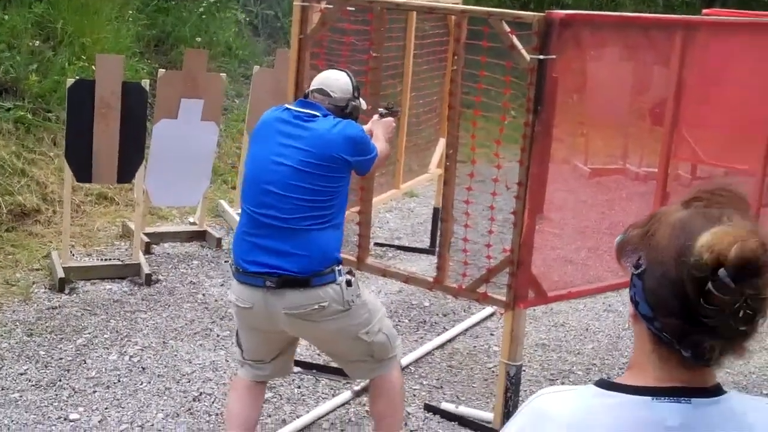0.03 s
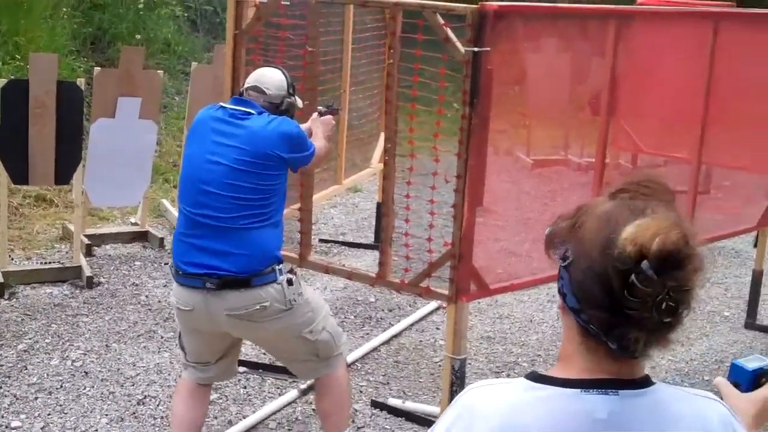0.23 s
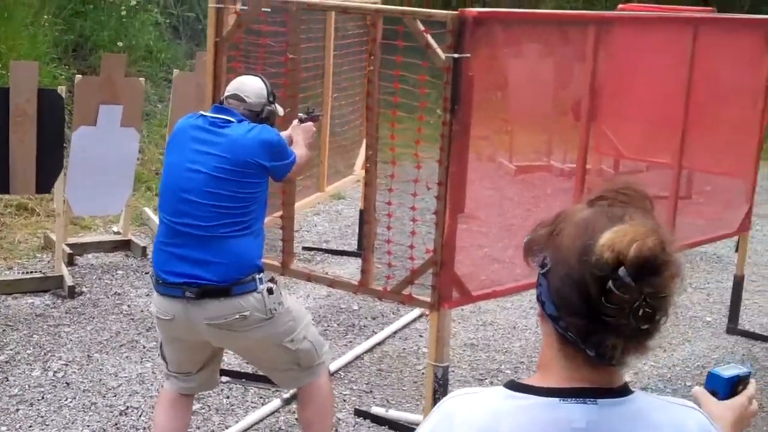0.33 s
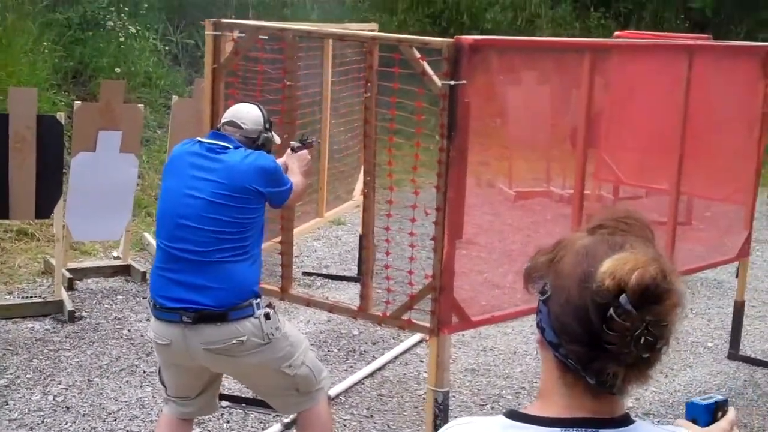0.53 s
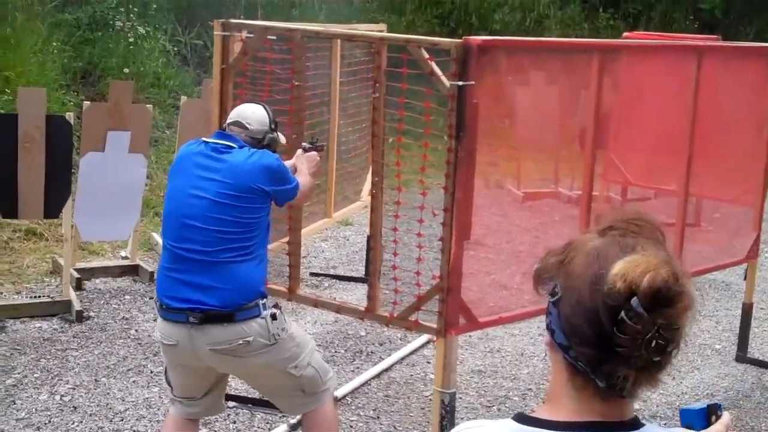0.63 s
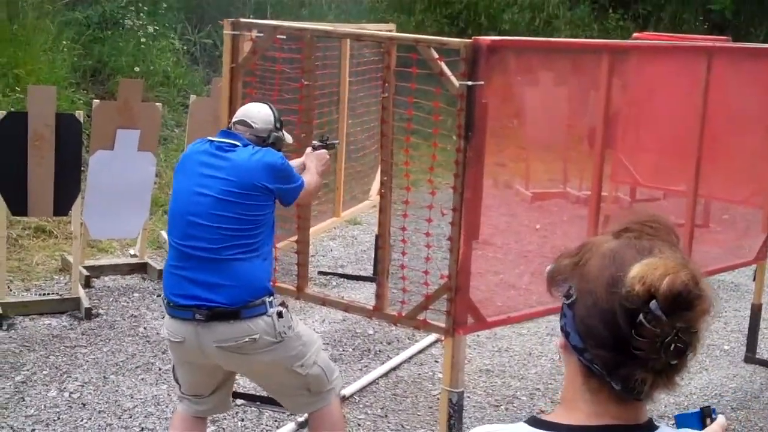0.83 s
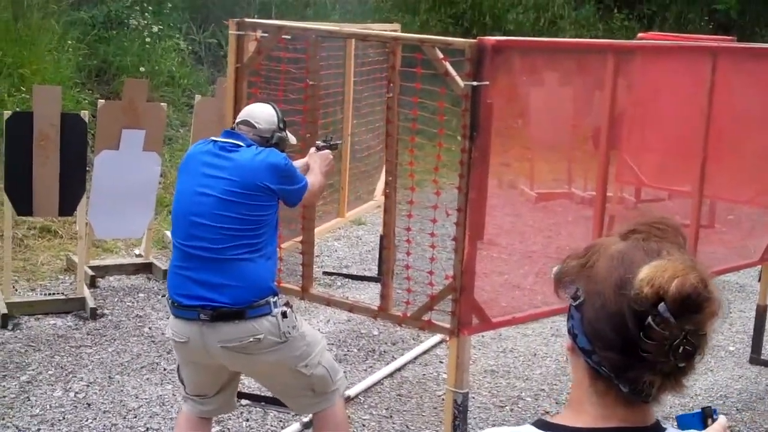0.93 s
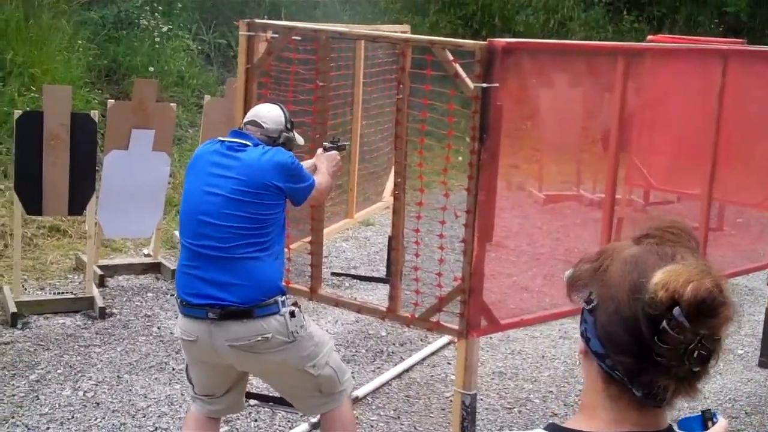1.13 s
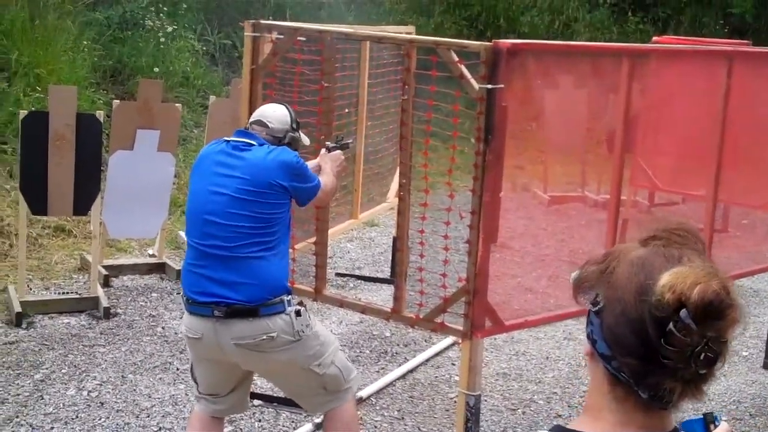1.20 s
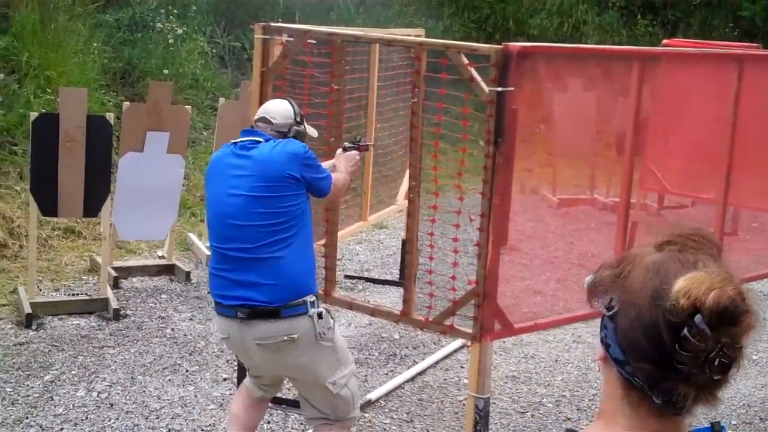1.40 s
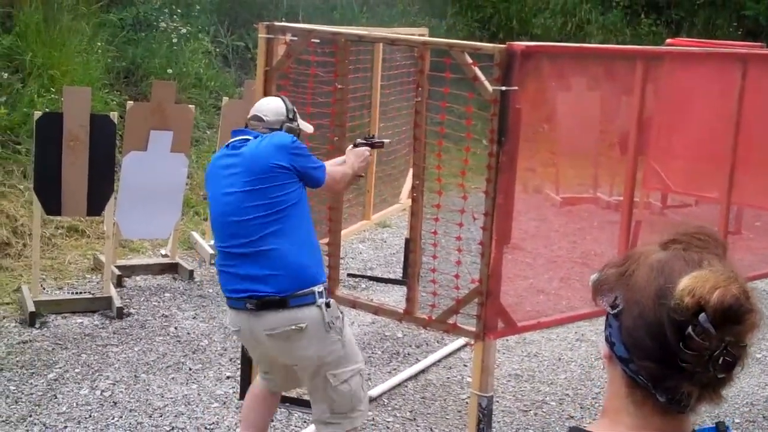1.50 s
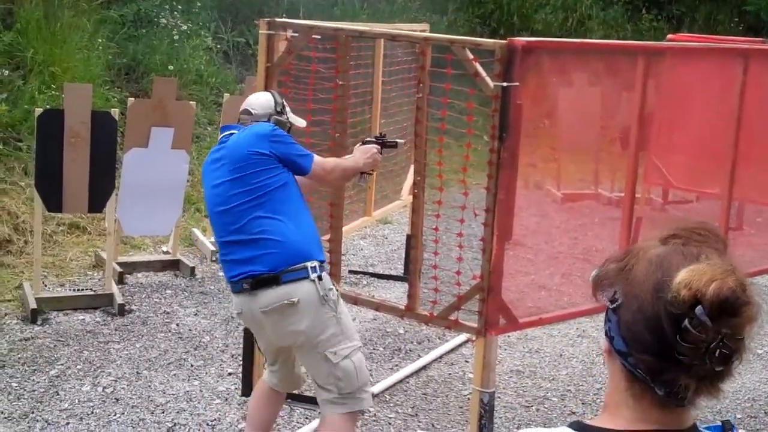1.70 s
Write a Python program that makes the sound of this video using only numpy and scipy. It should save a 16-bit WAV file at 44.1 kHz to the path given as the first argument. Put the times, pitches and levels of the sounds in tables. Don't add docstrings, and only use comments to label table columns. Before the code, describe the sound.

Four loud handgun shots fire about a third of a second apart in an outdoor gravel bay, with hard slap echoes and a fading tail from the trees, heard a few steps behind on an overloading microphone.

```python
import sys
import numpy as np
from scipy import signal
from scipy.fft import rfft, irfft
from scipy.io import wavfile

SR = 44100
rng = np.random.default_rng(int(sys.argv[2]) if len(sys.argv) > 2 else 0)


def voltage_ratio(decibels):
    exponent = np.asarray(decibels, float) / 20
    return 10 ** exponent


def output_pcm(signal):
    pcm = np.clip(np.atleast_2d(signal).T, -1, 1) * 32767
    wavfile.write(sys.argv[1], SR, np.round(pcm).astype(np.int16))


N = 77175

# t/s, blast level/dB, recorder gain settled to/dB
SHOTS = [
    (0.2401, 2.5, 10.5),
    (0.6208, 0.5, 2.5),
    (0.9919, -1, -1),
    (1.2755, -2.5, 2),
]
# delay t/s, level/dB, pulse width/s
FRAME_ECHOES = [
    (.0022, -18.5, 0.001),
    (.0052, -21.5, .0008),
    (.0145, -10.5, .0006),
    (.0285, -7.5, .001),
    (.0365, 1.5, .0004),
    (.0410, -7.5, .0011),
    (.0421, -6, 0.0007),
]
# delay t/s, level/dB, half width/s
FRAME_ROWS = [
    (.003, 6, .003),
    (.013, 0, .003),
    (.021, -3.5, .002),
    (.027, -7, 0.0013),
    (0.031, -17.5, .002),
    (.037, -1, 0.0025),
    (0.043, -11, 0.00072),
]
# f/Hz, level/dB per Hz
FRAME_SPECTRUM = [(35, -42), (60, -22), (192, -12), (751, -1.5), (2810, -7.5), (3610, -2), (5960, -9.5),
                  (9190, -13), (13800, -41.5)]
BANK_SPECTRUM = [(35, -69), (60, -39), (201, -20), (316, -13), (686, -9.5), (881, -9.5), (3150, -5),
                 (8990, -14.5), (13800, -34)]
TREE_SPECTRUM = [(59, -52), (100, -22), (182, -26), (554, -8), (948, -7.5), (1460, -11), (2210, -8.5),
                 (8620, -20.5), (13800, -42.5)]
# f/Hz, level/dB per Hz
AIR_SPECTRUM = [(35, -51), (60, -31), (201, -10.5), (751, 1.5), (5960, -19.5), (11800, -40.5), (13800, -71)]
WIND_SPECTRUM = [(15, -6), (40, 2), (110, -4), (200, -22)]
# f/Hz, likeness/1
DIFFUSE_LIKENESS = [(60, -0.34), (230, 1), (900, 0.73), (3470, 0.33), (13400, -0.05)]
CLOSE_LIKENESS = [(60, 0.68), (230, 0.66), (900, 0.88), (3470, 0.59), (13400, 0.092)]
# f/Hz, left minus right level/dB
LEAN = [(60, 2), (230, 2.5), (900, 2), (3470, 3.5), (13400, -2)]
# multiple of the fundamental/1, level/dB
ENGINE_HARMONICS = [(1, -74.5), (2, -77.5), (4, -78)]
# t/s, level/dB
ENGINE_SWELL = [(0, 2.5), (.2, 4.5), (.5, 10), (.62, 3), (.76, -17), (.9, -9), (.95, 3), (1.1, 17),
                (1.75, -10)]
# t/s, level/dB, half length/s
TICKS = [
    (.135, -72, .012),
    (1.618, -52, .002),
    (1.677, -54, .003),
    (1.70, -53, .002),
    (1.731, -54, .003),
    (1.743, -53, .002),
]

PATTERN_SIZE = 65536


def rms_one(x):
    return x / np.sqrt(np.mean(x ** 2) + 1e-20)


def at_hz(points, hz):
    table = np.array(points)
    return np.interp(np.log(hz + 1), np.log(table[:, 0]), table[:, 1])


def tent(t, peak_s, before_db_s, after_db_s):
    slope = np.where(t < peak_s, before_db_s, -after_db_s)
    return voltage_ratio(slope * (t - peak_s))


def scatter(spectrum, per_s, size, likeness=DIFFUSE_LIKENESS, skew=0):
    impulses = rng.standard_normal((2, size))
    impulses[0] -= skew * rng.exponential(1, size)
    impulses *= rng.random((2, size)) < per_s / SR
    hz = np.arange(size // 2 + 1) * SR / size
    alike = np.clip(at_hz(likeness, hz), 0, .98)
    mid, side = rfft(impulses / impulses.std(axis=1)[:, None]) * voltage_ratio(at_hz(spectrum, hz))
    ears = np.sqrt(1 + alike) * mid + np.sqrt(1 - alike) * side * [[1], [-1]]
    balance = voltage_ratio(at_hz(LEAN, hz) * [[.5], [-.5]])
    return rms_one(irfft(ears * balance, size))


def moving_air():
    air = voltage_ratio(-61) * scatter(AIR_SPECTRUM, SR, size=N + 1)
    wind = voltage_ratio(-86) * scatter(WIND_SPECTRUM, SR, size=N + 1)
    return (air + wind)[:, :N]


def engine(t):
    fundamental_hz = 134
    wander = .006 * np.cumsum(rng.standard_normal(N)) / 10
    phase = 2 * np.pi * fundamental_hz * t + wander
    tone = sum(voltage_ratio(db) * np.sin(k * phase) for k, db in ENGINE_HARMONICS)
    return voltage_ratio(np.interp(t, *np.transpose(ENGINE_SWELL))) * tone


def gravel_ticks(t):
    bright = scatter([(2000, -17), (5000, 0), (13000, -6)], SR, size=N + 1)[:, :N]
    return bright * sum(voltage_ratio(db) * np.exp(-((t - s) / half_s) ** 2) for s, db, half_s in TICKS)


def dull_knock(t):
    start_s, level_db, ring_hz, t60_s = .2285, -47.5, 594, 0.22
    u = np.maximum(t - start_s, 0)
    crack = scatter(FRAME_SPECTRUM, 8500, size=N + 1)[:, :N]
    crack = crack * (0.75 + 0.38 * np.exp(-u / 0.0058))
    ring = np.sin(2 * np.pi * ring_hz * u)
    return (ring + crack) * voltage_ratio(level_db - 60 * u / t60_s) * (u > 0)


def reflectors():
    t = np.arange(PATTERN_SIZE) / SR
    skew = 1.2
    rows_db = sum(db * np.exp(-((t - delay) / width) ** 2) for delay, db, width in FRAME_ROWS)
    frames = scatter(FRAME_SPECTRUM, 3000, PATTERN_SIZE, CLOSE_LIKENESS, skew) * voltage_ratio(rows_db)
    banks = scatter(BANK_SPECTRUM, 12000, PATTERN_SIZE, CLOSE_LIKENESS, skew / 2)
    trees = scatter(TREE_SPECTRUM, SR, PATTERN_SIZE)
    return np.array([frames, banks, trees])


def frame_reverberation(t, paths):
    start_db, fall_db_s, end_s, cut_db_s = -5.5, 176, 0.05, 1500
    return voltage_ratio(start_db - fall_db_s * end_s) * tent(t, end_s, -fall_db_s, cut_db_s) * paths


def bank_reverberation(t, paths):
    start_db, fall_db_s, end_s, cut_db_s = -17, 59, 0.11, 498
    body_hz, body_loss_db_s = 1120, 152
    body = signal.filtfilt(*signal.butter(1, body_hz, fs=SR), paths)
    body_gain = voltage_ratio(-body_loss_db_s * (np.minimum(t, end_s) - 0.0895))
    gain = voltage_ratio(start_db - fall_db_s * end_s) * tent(t, end_s, -fall_db_s, cut_db_s)
    return gain * (paths - body + body * body_gain)


def tree_reverberation(t, paths):
    level_db, peak_s, rise_db_s, fall_db_s = -37.5, 0.22, 26, 46
    leaves_hz, leaves_loss_db_s = 3530, 33
    dull = signal.filtfilt(*signal.butter(1, leaves_hz, fs=SR), paths)
    far = dull + (paths - dull) * voltage_ratio(-leaves_loss_db_s * (t - peak_s))
    return voltage_ratio(level_db) * tent(t, peak_s, rise_db_s, fall_db_s) * far


def muzzle_blast(t):
    level_db, length_s, ring_hz, ring = -11, .0011, 7000, 1.3
    envelope = np.exp(-(t / length_s) ** 2) * (1 - np.exp(-t * SR / 2))
    return voltage_ratio(level_db) * envelope * (ring * np.cos(2 * np.pi * ring_hz * t) - 1)


def suction_pulse(t, width):
    u = t / width - 3
    return (u ** 2 - 1) * np.exp(-u ** 2 / 2)


def report(paths):
    t = np.arange(paths.shape[2]) / SR
    diffuse = (frame_reverberation(t, paths[0]) + bank_reverberation(t, paths[1])
               + tree_reverberation(t, paths[2]))
    diffuse = diffuse * np.minimum(t / .0018, 1)
    slaps = sum(voltage_ratio(db) * suction_pulse(t - delay + width, width / 3) for delay, db, width in FRAME_ECHOES)
    return diffuse + muzzle_blast(t) + slaps


def gunfire():
    out = np.zeros((2, N + 4 * SR))
    same_paths = 0.61
    fixed = reflectors()
    earlier = (-0.33, -8.5)
    for s, db in [earlier] + [row[:2] for row in SHOTS]:
        paths = same_paths * fixed + np.sqrt(1 - same_paths ** 2) * reflectors()
        shot = report(paths)
        if s < 0:
            shot = signal.lfilter(*signal.butter(1, 2300, fs=SR), shot)
        i = int((s + 1) * SR)
        out[:, i:i + shot.shape[1]] += voltage_ratio(db) * shot
    out = signal.lfilter(*signal.butter(2, 150, "high", fs=SR), out)
    return out[:, SR:SR + N]


def scene():
    t = np.arange(N) / SR
    left_db = 0.76
    mix = moving_air() + engine(t) + gravel_ticks(t) + dull_knock(t) + gunfire()
    return mix * voltage_ratio(np.array([[left_db], [-left_db]]))


def automatic_gain(dry):
    t = np.arange(N) / SR
    start_db, fall_s = 25.5, 0.093
    gain_db, last = np.full(N, start_db), start_db
    for s, _, settled in SHOTS:
        gain_db = gain_db + (settled - last) * (1 - np.exp(-np.maximum(t - s, 0) / fall_s))
        last = settled
    return dry * voltage_ratio(gain_db)


def limiter(x):
    threshold_db, share, smooth_s = 1, 0.91, 0.0049
    keep = np.exp(-1 / (smooth_s * SR))
    power = signal.lfilter([1 - keep], [1, -keep], np.mean(x ** 2, axis=0))
    level_db = 10 * np.log10(power + 1e-12)
    return x * voltage_ratio(-share * np.maximum(level_db - threshold_db, 0))


def overload(x, ceiling):
    lopsided, knee = 0.29, 5.2
    x = np.where(x < 0, x * (1 + lopsided), x)
    x = ceiling * x / (1 + np.abs(x) ** knee) ** (1 / knee)
    return np.where(x < 0, x / (1 + lopsided), x)


def top_cut(x):
    return signal.sosfilt(signal.butter(12, 14000, fs=SR, output="sos"), x)


def record(dry):
    ceiling = 1.127
    x = limiter(automatic_gain(dry) / ceiling)
    x = overload(x, ceiling)
    x = signal.sosfilt(signal.cheby2(16, 55, 14900, fs=SR, output="sos"), x)
    x = signal.lfilter(*signal.butter(1, 1.7, "high", fs=SR), x)
    mix = np.clip(x, -.99, .99)
    return top_cut(mix)


dry = scene()
out = record(dry)
output_pcm(out)
```